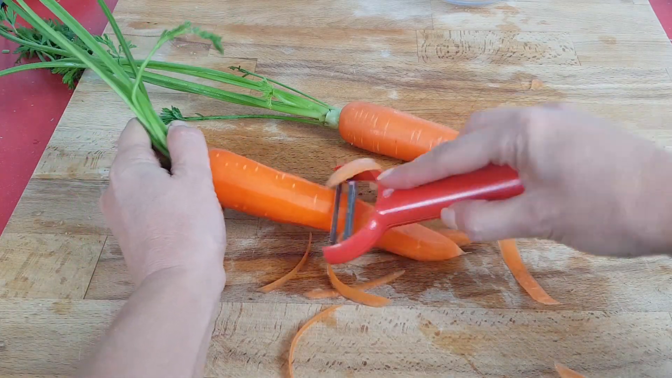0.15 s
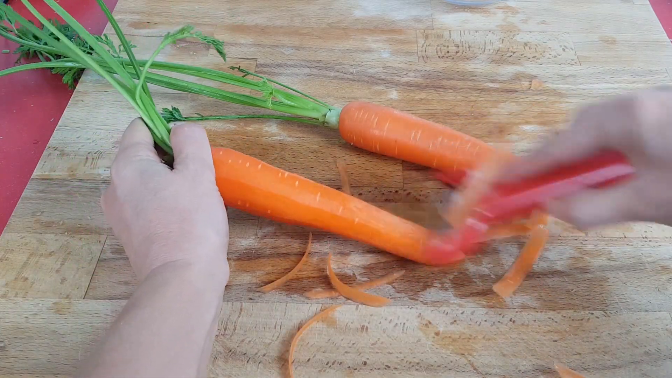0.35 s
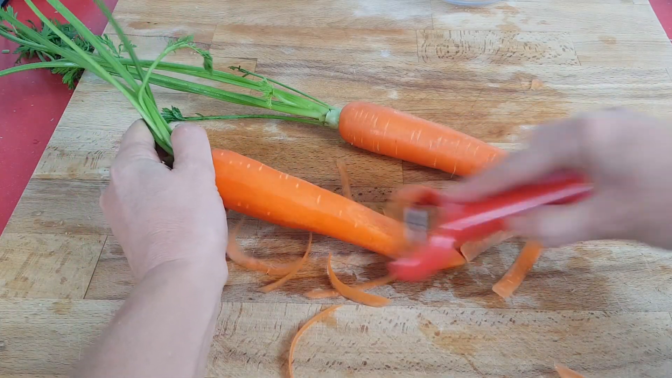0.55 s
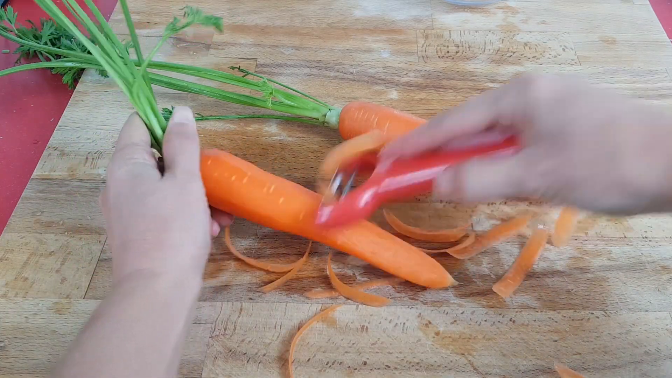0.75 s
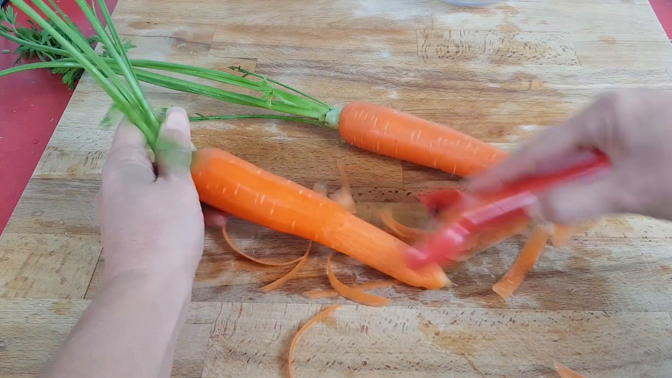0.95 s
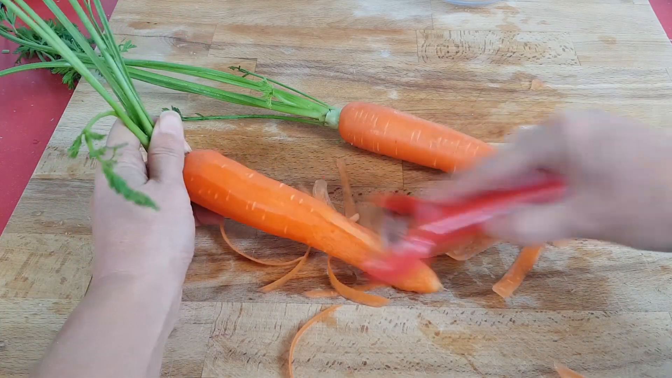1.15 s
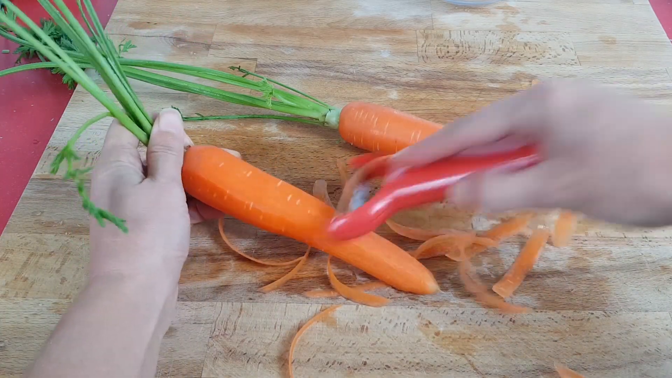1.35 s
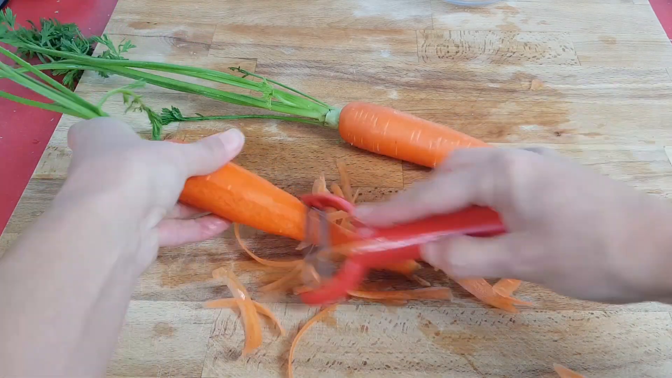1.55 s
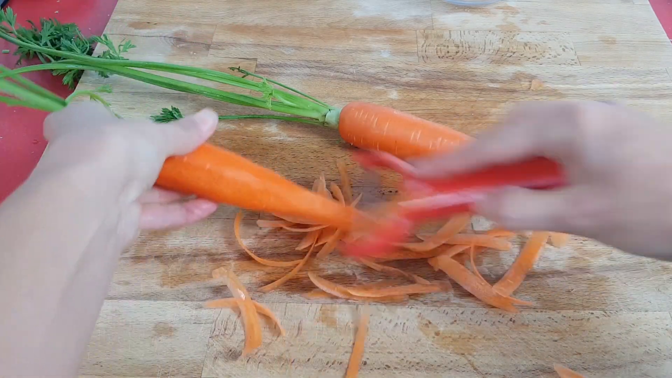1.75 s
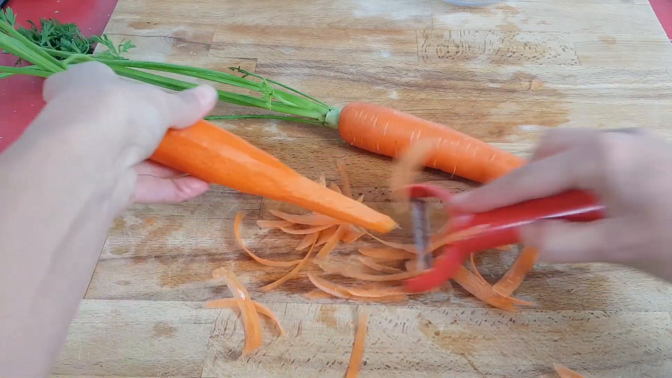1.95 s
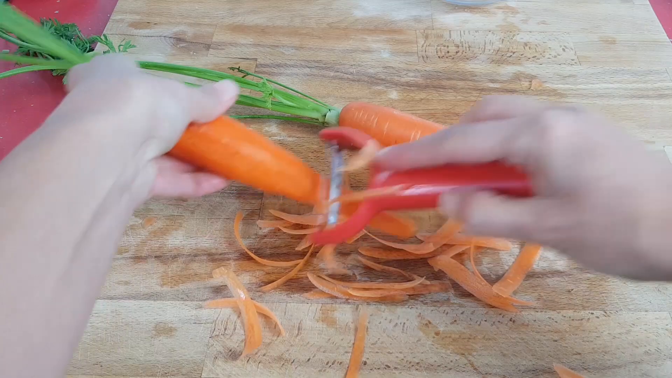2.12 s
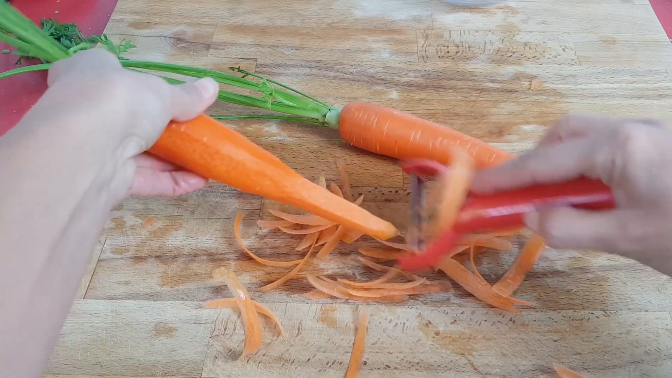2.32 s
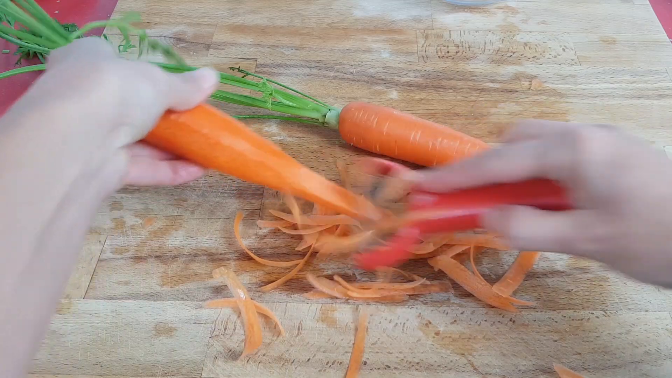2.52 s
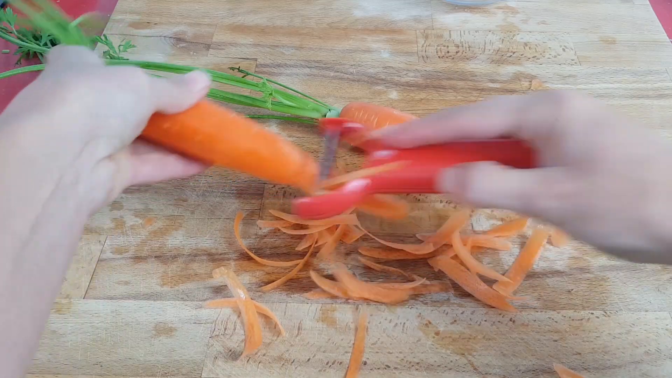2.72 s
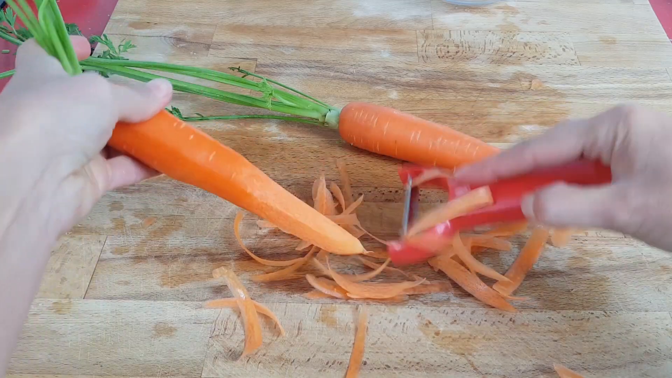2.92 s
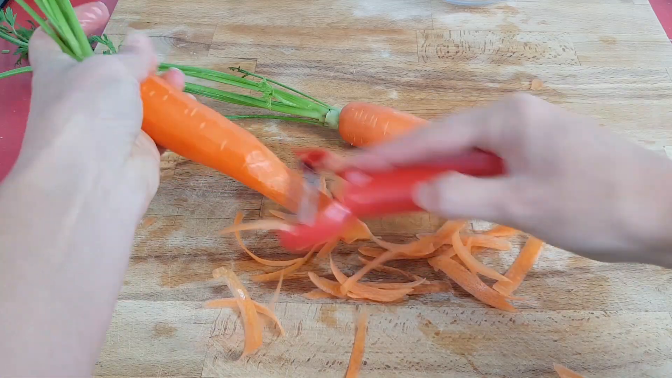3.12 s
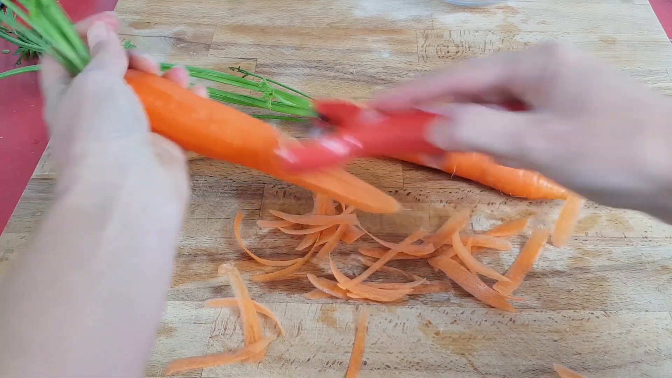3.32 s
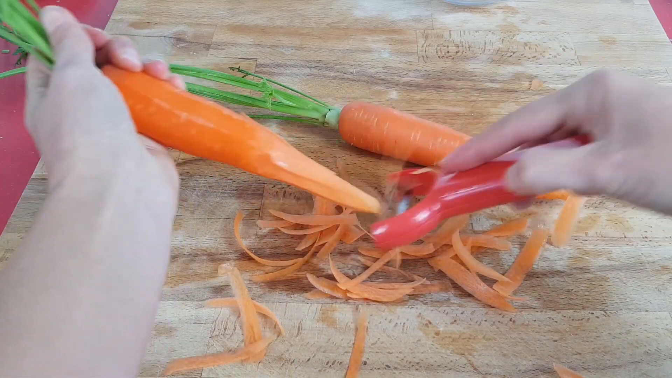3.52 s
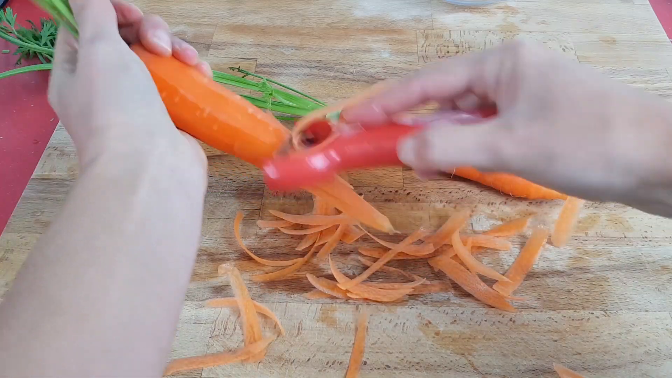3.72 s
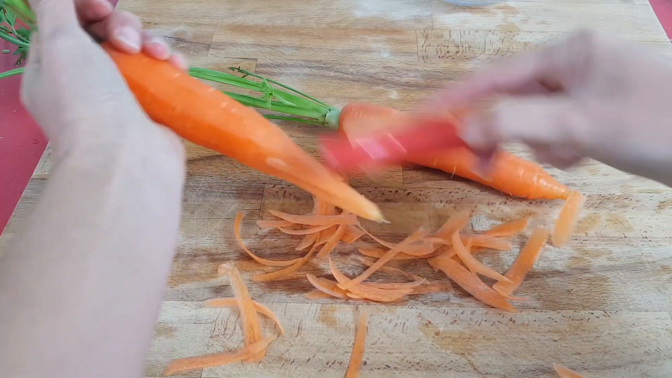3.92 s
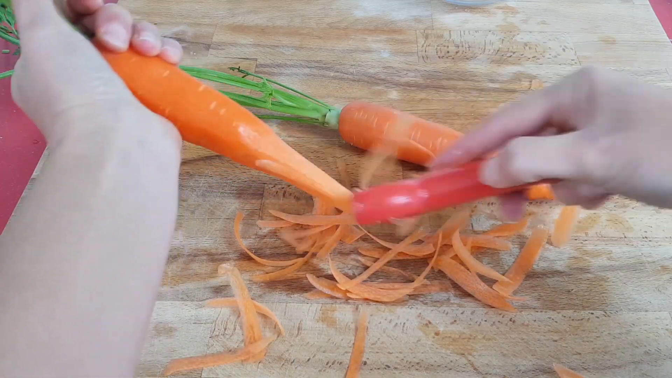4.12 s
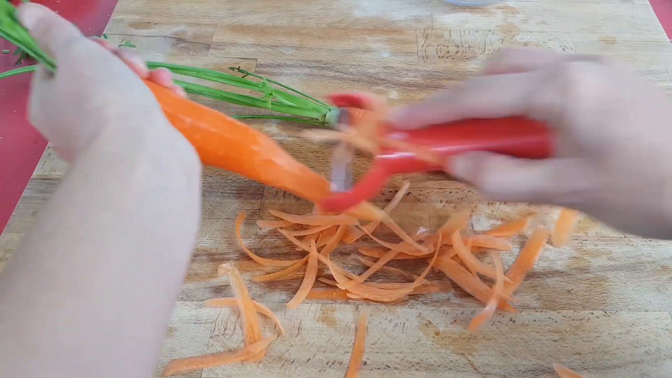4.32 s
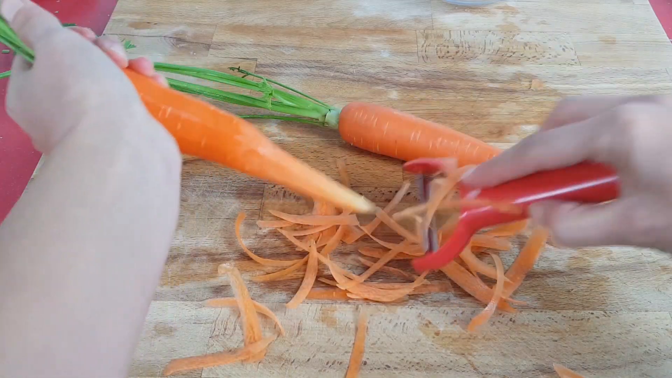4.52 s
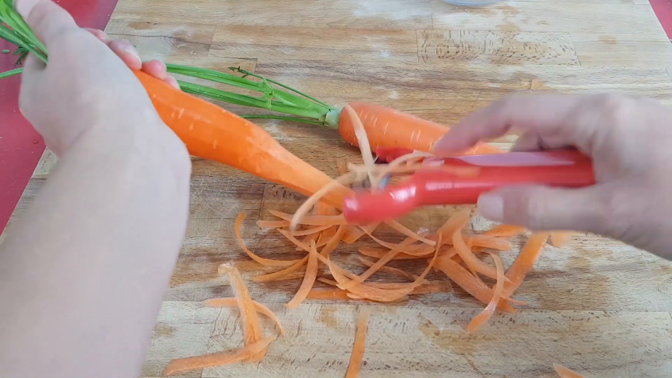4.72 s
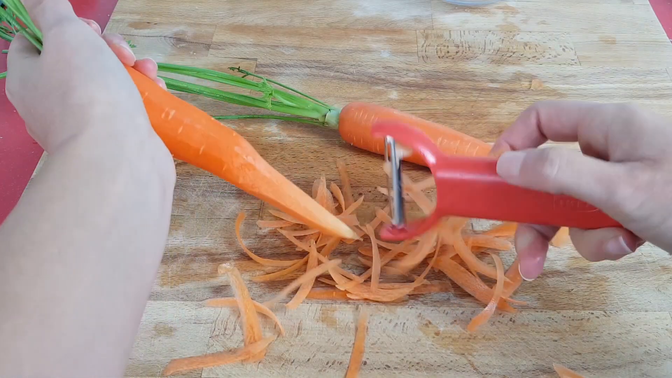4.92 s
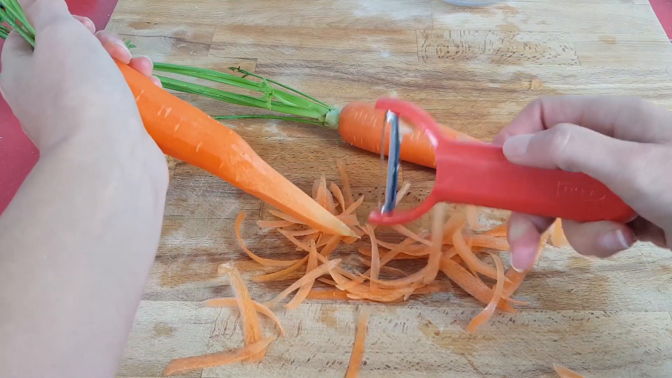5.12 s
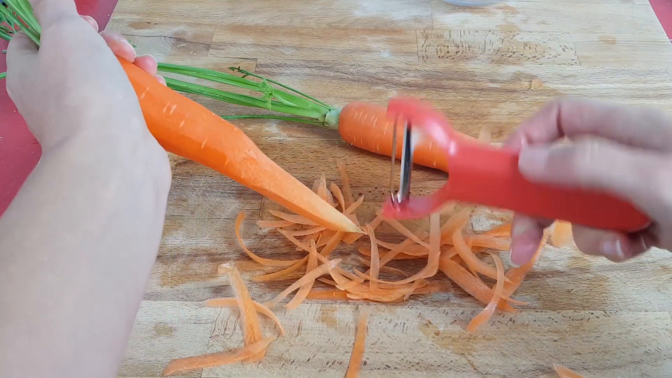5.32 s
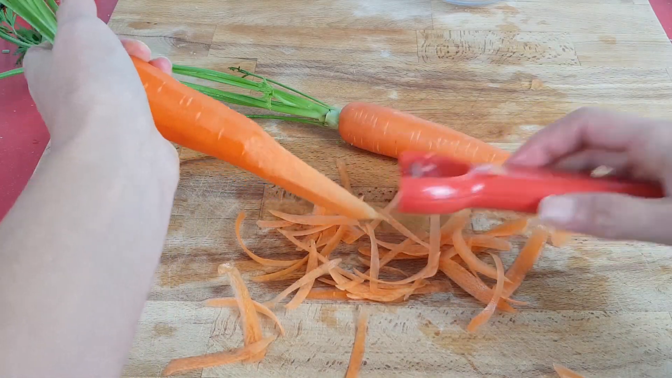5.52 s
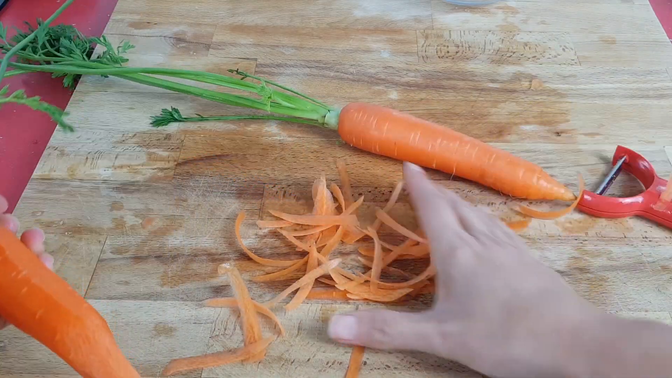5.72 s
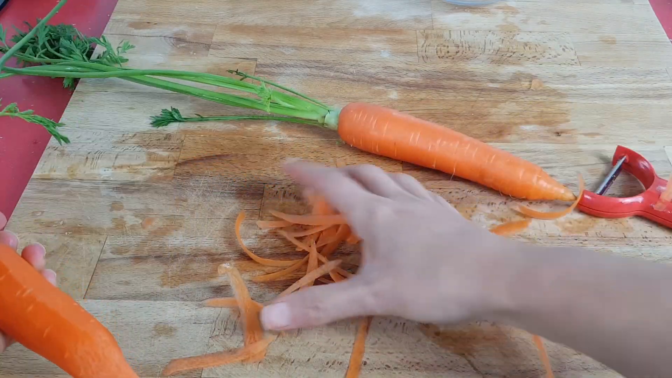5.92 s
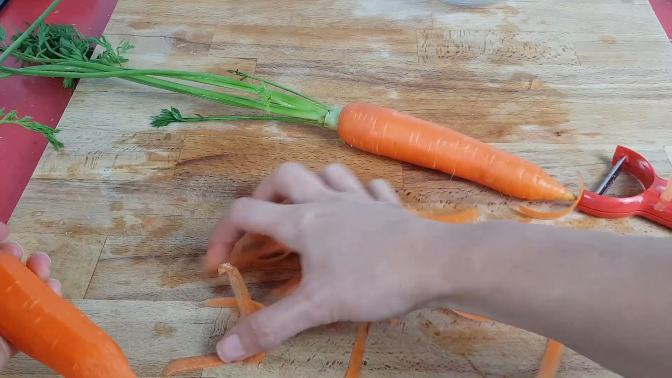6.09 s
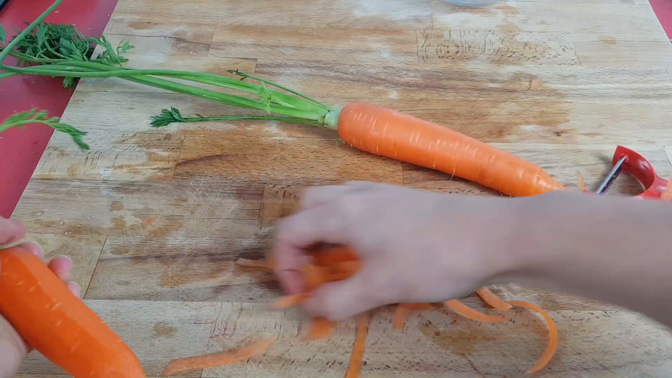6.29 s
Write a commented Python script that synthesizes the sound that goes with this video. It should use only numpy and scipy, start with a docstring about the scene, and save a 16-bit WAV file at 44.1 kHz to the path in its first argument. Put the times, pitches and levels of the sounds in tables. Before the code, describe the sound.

Quick wet scrapes of carrot peeling, with a loose metal blade clicking and rattling between strokes and a fridge humming behind.

```python
"""A fridge hums in a kitchen throughout. From the start, close to a two-port microphone, a hand peeler
shaves a raw carrot in quick strokes: the loose swivel blade clacks as it bites, hisses along the wet
flesh and rattles on the way back. For the first 2 s the carrot tip drags and bumps on a wooden board,
which drones along. The cuts end near 4.9 s and the peeler is shaken in the air. From 5.6 s leaves and
peelings settle; near 6.3 s a palm starts to sweep them together."""
import sys
import numpy as np
from scipy import signal
from scipy.fft import rfft, irfft, next_fast_len
from scipy.io import wavfile
from scipy.ndimage import uniform_filter1d, map_coordinates

SR = 44100
rng = np.random.default_rng(int(sys.argv[2]) if len(sys.argv) > 2 else 0)


def bounce(signal):
    """Save signal as a 16-bit WAV file at the path given by the first command-line argument."""
    frames = np.transpose(np.atleast_2d(signal))
    limited = np.clip(frames, -1, 1)
    pcm = np.round(limited * 32767).astype(np.int16)
    wavfile.write(sys.argv[1], SR, pcm)


N = 284533

# Table levels are relative, ahead of filters and mix gains.
HUM_TONES = [(49, -65.5), (68, -59.5), (100, -50.5), (201, -59)]  # compressor: pitch_hz, level_db
RUMBLE_COLOUR = [(15, -39), (25, -12.5), (108, -3), (161, -8), (206, -6), (309, -6.5), (363, -12),
                 (451, -7.5), (677, -16.5), (818, -32.5), (4490, -41.5), (7110, -31), (16000, -45.5)]  # room rumble: freq_hz, gain_db
RUMBLE_LIKENESS = [(50, 1), (300, 0.85), (1000, 0.42), (4000, 0.23)]  # left against right: freq_hz, correlation
WORK_LIKENESS = [(800, 0.21), (2000, 0.82), (5000, 0.15), (12000, 0.077)]  # cuts and peeler, left against right: freq_hz, correlation
ROOM_DECAY = [(400, 0.41), (3000, 0.5), (12000, 0.043)]  # kitchen echo: freq_hz, t60_s

# cuts: start_s, length_s, shaving_start_db, shaving_end_db, sizzle_start_db
STROKES = [(-0.05, 0.072, -42.5, -40.5, -40.5), (0.185, 0.12, -43, -37.5, -41),
           (0.488, 0.12, -39.5, -37.5, -39.5), (0.798, 0.12, -41, -37.5, -40), (1.112, 0.11, -39, -40, -38),
           (1.418, 0.097, -41.5, -37.5, -47), (1.881, 0.098, -46, -38.5, -40.5),
           (2.175, 0.13, -38, -47, -31), (2.486, 0.11, -43.5, -40.5, -36.5), (2.785, 0.12, -43, -42, -37.5),
           (3.073, 0.14, -44, -42, -40), (3.404, 0.15, -39.5, -50.5, -30.5), (3.718, 0.12, -40, -44, -32),
           (4.047, 0.11, -42, -46, -31), (4.425, 0.087, -46.5, -48.5, -34.5),
           (4.712, 0.13, -45, -48.5, -34)]
# cut spectra, broad as the flesh damps the steel: freq_hz, gain_db
SHAVING_COLOUR = [(1500, -28.5), (2200, -17), (3000, -7.5), (3600, -8), (4100, -8), (5200, -15.5),
                  (6500, -19.5), (8000, -53)]
RASP_COLOUR = [(800, -32), (1150, -10), (1400, -3.5), (1900, -8.5), (2400, -20), (3000, -66)]
SIZZLE_COLOUR = [(4500, -33.5), (6200, -11), (7800, -7.5), (10300, -4), (12500, -2), (14600, -9.5),
                 (15300, -3), (16200, -11.5)]

DRAGS = [(-0.01, 0.039, -37.5, -50), (0.2, 0.11, -51.5, -47), (0.51, 0.14, -56, -39),
         (0.815, 0.12, -48, -52.5), (1.14, 0.14, -44, -65.5), (1.43, 0.1, -56.5, -47.5),
         (1.61, 0.054, -58, -48), (1.895, 0.019, -55.5, -45.5), (1.955, 0.054, -35.5, -38.5),
         (6.285, 0.19, -61, -47)]  # tip on the board, last row the palm: start_s, length_s, start_db, end_db
BUMPS = [(0.186, -38), (0.487, -33), (0.627, -27.5), (0.801, -31.5), (1.121, -27), (1.416, -39.5),
         (1.521, -38.5), (1.882, -38.5), (1.922, -38), (1.947, -31.5)]  # tip hitting the board: start_s, level_db
BOARD_MODES = [(410, 50, -13), (545, 45, -7), (641, 22, 0), (808, 32, -5), (900, 60, -11)]  # wood resonances: freq_hz, width_hz, gain_db
# soft contact on the wood: freq_hz, gain_db
CONTACT_COLOUR = [(300, -12), (480, -2.5), (650, 2.5), (900, -3), (1100, -14.5), (1300, -17)]

CLACKS = [(0.0506, -27.5, -1, 0.073), (0.1286, -30.5, -8, 0.052), (0.1847, -10.5, -3, .023),
          (0.3508, -24.5, -2, 0.045), (0.4092, -31, 2, 0.054), (0.4845, -14, 0, 0.039),
          (0.626, -29, -3.5, 0.17), (0.7396, -35.5, -2, 0.14), (0.797, -14, 1, 0.021),
          (0.956, -25.5, -1.5, 0.1), (1.076, -32, -10, 0.23), (1.1089, -14.5, -1, 0.056),
          (1.2656, -16, -9, 0.026), (1.304, -16.5, -35, .03), (1.3628, -31, -8, 0.1),
          (1.395, -26, -3.5, 0.045), (1.412, -17.5, -3, 0.038), (1.5586, -20.5, -6, 0.056),
          (1.621, -28, -4, 0.36), (1.691, -22.5, -10.5, 0.086), (1.8766, -15, -1.5, 0.042),
          (2.0022, -20, -16, 0.11), (2.026, -28.5, 2.5, 0.075), (2.129, -31, -9, 0.056),
          (2.1734, -7, -2.5, 0.026), (2.3035, -7.5, -7.5, 0.017), (2.3164, -20.5, 0, 0.087),
          (2.4466, -30, -8, 0.054), (2.486, -11, -2.5, .035), (2.6296, -13, -11.5, 0.03),
          (2.6448, -25.5, -1, 0.05), (2.7501, -33, -19, 0.056), (2.7849, -15.5, -1, 0.031),
          (2.9015, -30, -6.5, 0.087), (2.9152, -20.5, -1.5, 0.096), (3.0626, -33.5, -19, 0.047),
          (3.0857, -16.5, 3.5, 0.06), (3.2305, -21, -8.5, 0.067), (3.261, -33.5, -1, .05),
          (3.356, -40, -5, 0.17), (3.4114, -10, -0.5, 0.051), (3.577, -16.5, -20.5, 0.032),
          (3.593, -25.5, -18.5, 0.044), (3.7, -23, -17.5, 0.089), (3.7161, -13.5, 0, 0.047),
          (3.8723, -18, -6.5, 0.079), (3.996, -33.5, -7, 0.11), (4.04, -10, 0, 0.038),
          (4.186, -20.5, -9, 0.061), (4.251, -27.5, -9.5, 0.073), (4.265, -26, -3, 0.086),
          (4.362, -34, -4.5, 0.089), (4.4241, -7.5, -2.5, 0.024), (4.5075, -24.5, -5.5, 0.14),
          (4.5274, -27.5, 3.5, 0.17), (4.6692, -30.5, -17.5, 0.088), (4.7178, -11.5, -2.5, .03),
          (4.8406, -20.5, -1.5, 0.14), (4.979, -30.5, -19, .04), (5.0315, -22, -12.5, 0.072),
          (5.127, -19, -36, 0.034), (5.1592, -18.5, -29, 0.032), (5.1753, -29, -10, 0.059),
          (5.2595, -25, -7, .12), (5.292, -18, -27, 0.057), (5.3543, -30, -7.5, 0.13),
          (5.374, -28, -8.5, 0.023), (5.4095, -15.5, -21, 0.065), (5.449, -27.5, -10, 0.15),
          (5.505, -30.5, -6, .083), (5.526, -23.5, -18.5, 0.087), (5.638, -33.5, -9, .04)]  # blade contacts: start_s, level_db, treble_offset_db, t60_s
# frame's share of a clack as the grip shifts: time_s, offset_db
FRAME_SHARE = [(0, -1), (2.0, -6), (3.2, -7), (3.8, -11), (4.8, -5.5), (5.15, -11), (5.6, -9.5)]
# free blade shivering: start_s, length_s, buzz_db, treble_db, fade_db
SHIVERS = [(0.07, .1, -50.5, -47.5, 4), (0.377, .1, -46.5, -45.5, 1), (0.64, 0.17, -50, -47.5, 9.5),
           (0.977, 0.09, -51, -51, 7.5), (1.276, 0.1, -46, -43, 5.5), (1.563, .28, -45.5, -41, 24.5),
           (2.029, 0.14, -55.5, -48.5, 8), (2.335, 0.16, -46.5, -45, 14), (2.65, .11, -53, -44, 20.5),
           (2.94, 0.11, -54, -46.5, 12.5), (3.233, 0.16, -62, -55.5, 8.5), (3.604, 0.14, -52.5, -63, 7.5),
           (3.9, 0.11, -43, -39.5, 26.5), (4.195, 0.22, -48.5, -46, 14.5), (4.552, 0.17, -56.5, -56, 4.5),
           (4.875, .15, -52, -46.5, 23), (5.05, .065, -52, -53, 8.5), (5.145, 0.1, -40.5, -46, 15),
           (5.302, 0.1, -44.5, -55.5, -5), (5.437, 0.14, -46, -51, 8), (5.596, 0.049, -53, -60, 1.5)]
# broad spectra of plastic frame, blade and cutting edge: freq_hz, gain_db
FRAME_COLOUR = [(1000, -34), (1400, -6.5), (2400, -6), (3200, -0.5), (4200, -40)]
BLADE_COLOUR = [(1400, -28), (1800, -23.5), (2800, -21), (3800, -4), (4600, -6), (6200, -6), (8000, -9),
                (12000, -25.5)]
EDGE_COLOUR = [(4500, -34), (6200, -0.5), (7800, -5.5), (10000, -6), (12500, -3.5), (14500, -18.5)]
# their resonances: freq_hz, width_hz, gain_db
FRAME_MODES = [(1642, 80, 4), (3040, 200, 9), (3550, 280, 16)]
BLADE_MODES = [(1810, 45, 24), (3320, 110, 13), (3900, 55, 6), (4030, 45, 13), (4190, 45, 13),
               (4670, 50, 8), (9885, 18, 23), (10230, 35, 21)]
EDGE_MODES = [(7030, 60, 0.72), (9170, 140, 1.6), (9800, 180, 3.6), (10380, 78, 11.4), (10720, 65, 9.5),
              (11530, 80, 6.4), (15500, 460, 12)]

RUSTLE_LEVELS = [(5.6, -70), (5.72, -59), (5.86, -56), (6.0, -63.5), (6.2, -91)]  # leaves and peelings settling: time_s, level_db
RUSTLE_COLOUR = [(1500, -23), (4000, -25.5), (6500, -19), (11000, -18), (16000, -25)]  # their spectrum: freq_hz, gain_db
SWEEP_LEVELS = [(6.24, -106.5), (6.285, -59), (6.45, -49.5)]  # palm pushing peelings over wood: time_s, level_db
SWEEP_COLOUR = [(410, -62.5), (700, -30.5), (905, -13), (1060, -20.5), (2340, -24.5), (2960, -36),
                (9000, -51), (11700, -97.5), (19800, -120)]  # its spectrum: freq_hz, gain_db


def amp(db):
    """Decibels to gain."""
    return 10 ** (np.asarray(db) / 20)


def unit_rms(x):
    """Scale to rms 1."""
    return x / np.sqrt(np.mean(x ** 2) + 1e-20)


def at_hz(points, hz):
    """Interpolate (freq_hz, value) on a log axis."""
    freq_hz, values = np.transpose(points)
    return np.interp(np.log(hz + 1), np.log(freq_hz + 1), values)


def envelope(points):
    """Gain per sample from (time_s, level_db); the end levels hold outside."""
    return amp(np.interp(np.arange(N) / SR, *np.transpose(points)))


def ramps(rows, rise_s, fall_db_per_s):
    """Gain from (start_s, length_s, start_db, end_db): rise, straight dB slope, fall."""
    t, power = np.arange(N) / SR, np.zeros(N)
    for start_s, length_s, start_db, end_db in rows:
        end_s = start_s + length_s
        knots_s = [start_s - rise_s, start_s, end_s, end_s + 60 / fall_db_per_s]
        knots_db = [start_db - 40, start_db, end_db, end_db - 60]
        power += amp(np.interp(t, knots_s, knots_db, -200, -200)) ** 2
    return np.sqrt(power)


def wobble(rate_hz):
    """Smooth curve through random knots."""
    knots = rng.standard_normal(int(N * rate_hz / SR) + 4)
    return map_coordinates(knots, [np.arange(N) * rate_hz / SR])


def filtered(x, response):
    """Apply a complex frequency response."""
    size = 2 * next_fast_len(N // 2 + SR // 4)
    return irfft(rfft(x, size) * response(np.fft.rfftfreq(size, 1 / SR)), size)[..., :N]


def ringing(modes, hz):
    """Summed response of causal resonances."""
    return sum(amp(db) * 1j * hz * width_hz / (mode_hz ** 2 - hz ** 2 + 1j * hz * width_hz)
               for mode_hz, width_hz, db in modes)


def body(colour, modes=()):
    """Causal response of mean power 1: broad colour plus resonances."""
    def response(hz):
        cepstrum = irfft(np.log(amp(at_hz(colour, hz))))
        cepstrum[1:len(hz) - 1] *= 2  # fold to minimum phase
        cepstrum[len(hz):] = 0
        whole = np.exp(rfft(cepstrum)) * (1 + ringing(modes, hz))
        return whole / unit_scale(whole)

    def unit_scale(spectrum):
        return np.sqrt(np.mean(np.abs(spectrum) ** 2))
    return response


def stereo(pair, likeness):
    """Mix two unrelated signals to left and right of a given correlation."""
    def weights(hz):
        angle_rad = np.arccos(np.clip(at_hz(likeness, hz), -1, 1)) / 2
        return np.array([np.cos(angle_rad), np.sin(angle_rad)])
    mid, side = filtered(pair, weights)
    return np.array([mid + side, mid - side])


def grainy_noise(likeness, grain_db, lump_db, patch_db):
    """Stereo noise with fast grains, slower lumps and shifting patches of colour."""
    spectra = signal.stft(rng.standard_normal((2, N)), nperseg=512)[2]
    patches = uniform_filter1d(rng.standard_normal(spectra.shape[1:]), size=6, axis=0)
    patches = unit_rms(uniform_filter1d(patches, size=10, axis=1))
    pair = signal.istft(spectra * amp(patch_db * patches), nperseg=512)[1][:, :N]
    grains = amp(grain_db * wobble(900) + lump_db * wobble(60))
    return unit_rms(grains * stereo(pair, likeness))


def fridge():
    """Wavering compressor tones over room rumble."""
    t = np.arange(N) / SR
    hum = sum(amp(db + 2.7 * wobble(2)) * np.sin(2 * np.pi * pitch_hz * t + 0.89 * wobble(5))
              for pitch_hz, db in HUM_TONES)
    noise = stereo(rng.standard_normal((2, N)), RUMBLE_LIKENESS)
    rumble = filtered(noise, lambda hz: amp(at_hz(RUMBLE_COLOUR, hz)))
    return hum * amp([[1.6], [-1.6]]) + amp(-54.5) * unit_rms(rumble)


def cuts(bite_s=0.0099, release_db_per_s=326):
    """The edge digs in, tears wet fibres and slides off the tip."""
    tearing = grainy_noise(WORK_LIKENESS, grain_db=2.2, lump_db=1.5, patch_db=3)
    start_s, length_s, start_db, end_db, sizzle_db = np.transpose(STROKES)
    layers = [(SHAVING_COLOUR, start_db, end_db),
              (RASP_COLOUR, start_db - 11.5, end_db - 5),
              (SIZZLE_COLOUR, sizzle_db, end_db)]
    sound = np.zeros((2, N))
    for colour, from_db, to_db in layers:
        rows = zip(start_s + bite_s, length_s - bite_s, from_db, to_db)
        sound += filtered(ramps(rows, bite_s, release_db_per_s) * tearing, body(colour))
    return sound


def kitchen_echo(x):
    """Room tail; each frequency dies at its own rate."""
    hz, t, spectra = signal.stft(rng.standard_normal((2, SR // 2)), SR, nperseg=256)
    decay = amp(-60 * t / at_hz(ROOM_DECAY, hz)[:, None])
    tail = signal.istft(spectra * decay, SR, nperseg=256)[1]
    return signal.fftconvolve(x, tail / np.linalg.norm(tail[0]), axes=1)[:, :N]


def board():
    """Stuttering drags and bumps ring the board's low modes."""
    stutter = unit_rms(amp(3.9 * wobble(70)) * rng.standard_normal((2, N)))
    force = amp(6.5) * ramps(DRAGS, rise_s=0.011, fall_db_per_s=351) * stutter
    for start_s, level_db in BUMPS:
        force[0, round(start_s * SR)] += amp(level_db + 27)  # row 0 becomes the mid signal
    contact = filtered(stereo(force, likeness=[(600, 0.78)]), body(CONTACT_COLOUR))
    drone = filtered(contact, lambda hz: ringing(BOARD_MODES, hz))
    return amp(9) * drone * amp([[-0.8], [0.8]])


def clacks(contact_t60_s=0.004):
    """Hard contact, then the blade chatters in its seat: envelopes for frame, blade, edge."""
    drive = np.zeros((3, N + SR))
    t = np.arange(SR // 4) / SR
    for start_s, level_db, treble_db, t60_s in CLACKS:
        # dull clacks stir the frame less
        frame_db = np.interp(start_s, *np.transpose(FRAME_SHARE)) + 0.28 * treble_db
        gains = amp(level_db + np.array([[frame_db - 4], [-8.5], [treble_db - 2]]))
        rise_s = 0.00051 + 0.014 * max(t60_s - 0.06, 0)  # long chatter starts softer
        attack = 1 - np.exp(-t / rise_s)
        contact = amp(-3.5 - 60 * t / contact_t60_s)
        chatter = amp(-60 * t / t60_s)
        onset = round(start_s * SR)
        drive[:, onset:onset + len(t)] += gains * attack * (contact + chatter)
    return drive[:, :N]


def shivers():
    """The free blade rattles between and after cuts: envelopes for frame, blade, edge."""
    start_s, length_s, buzz_db, treble_db, fade_db = np.transpose(SHIVERS)
    buzz, treble = (ramps(zip(start_s, length_s, db, db - fade_db), rise_s=0.04, fall_db_per_s=4000)
                    for db in (buzz_db, treble_db))
    flicker = unit_rms(amp(1.5 * wobble(45)))
    return np.array([amp(-14) * buzz, buzz, treble]) * flicker


def peeler():
    """Clacks and shivers ring the frame, the blade and its edge."""
    drives = np.hypot(clacks(), shivers())
    rattle = grainy_noise(WORK_LIKENESS, grain_db=2.5, lump_db=0.67, patch_db=2.5)
    parts = [body(FRAME_COLOUR, FRAME_MODES), body(BLADE_COLOUR, BLADE_MODES),
             body(EDGE_COLOUR, EDGE_MODES)]
    return sum(filtered(drive * rattle, part) for drive, part in zip(drives, parts))


def peelings():
    """A faint rustle swells as they settle; the palm then pushes them with a dull, grainy rub."""
    grain = grainy_noise([(1000, 0.6)], grain_db=2, lump_db=2.2, patch_db=2.5)
    rustle = filtered(envelope(RUSTLE_LEVELS) * grain, body(RUSTLE_COLOUR))
    touch_s = SWEEP_LEVELS[0][0] - 0.01
    push = amp(7) * envelope([(touch_s, -120), *SWEEP_LEVELS])
    return rustle + filtered(push * grain, body(SWEEP_COLOUR))


def scene():
    """Near sources, their echo, the fridge."""
    near = cuts() + peeler() + board() + peelings()
    return near + amp(-12) * kitchen_echo(near) + fridge()


def record(dry, left_lag_s=50e-6, top_hz=15850):
    """Band-limited microphone; the left port lies slightly further off."""
    return filtered(dry, lambda hz: np.exp(-2j * np.pi * np.outer([left_lag_s, 0], hz)) * (hz < top_hz))


dry = scene()
out = record(dry)
bounce(out)
```